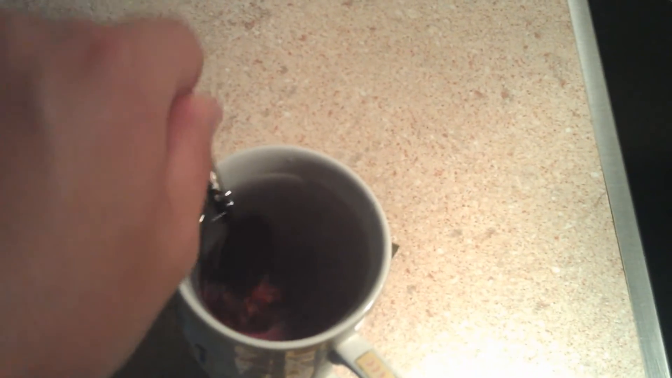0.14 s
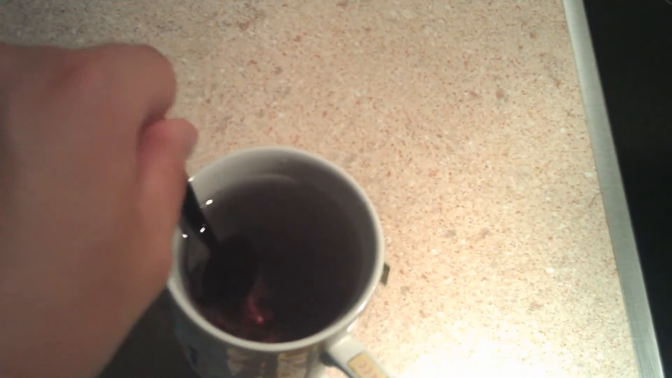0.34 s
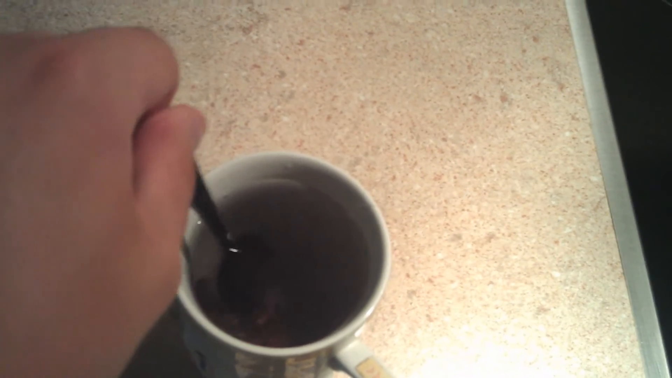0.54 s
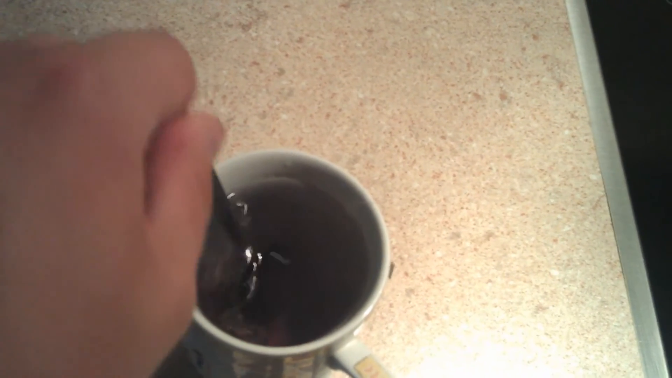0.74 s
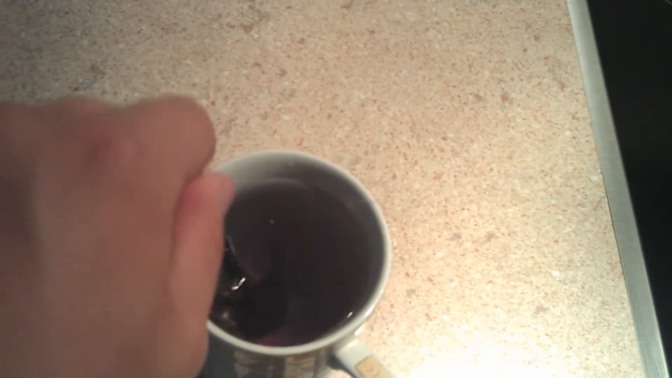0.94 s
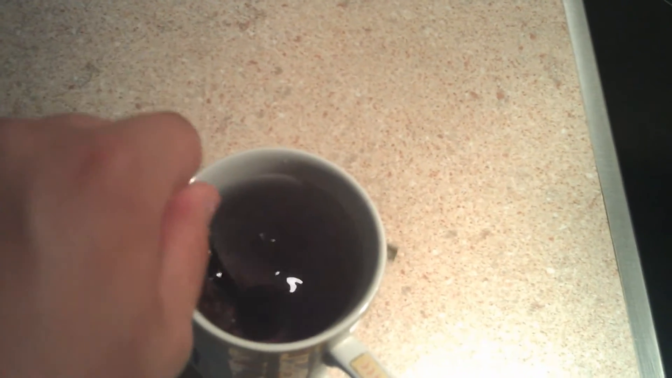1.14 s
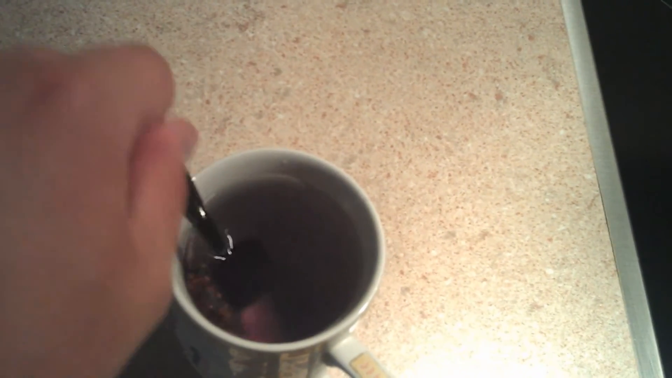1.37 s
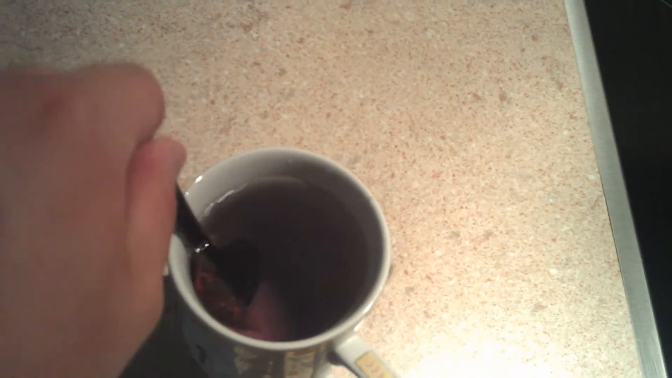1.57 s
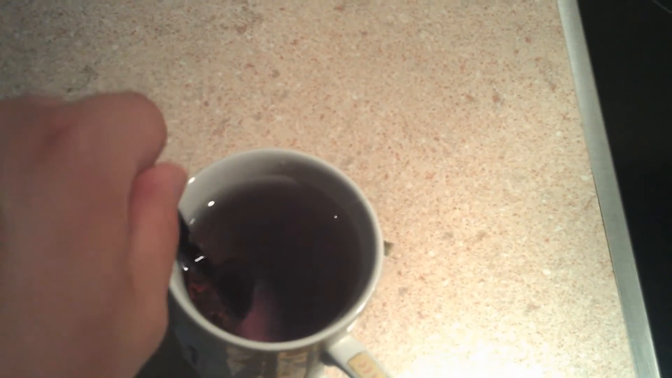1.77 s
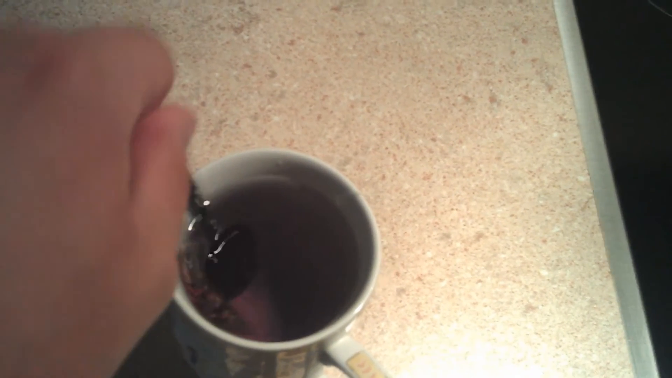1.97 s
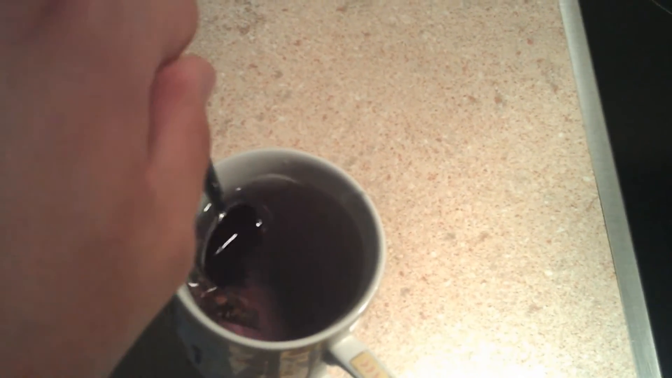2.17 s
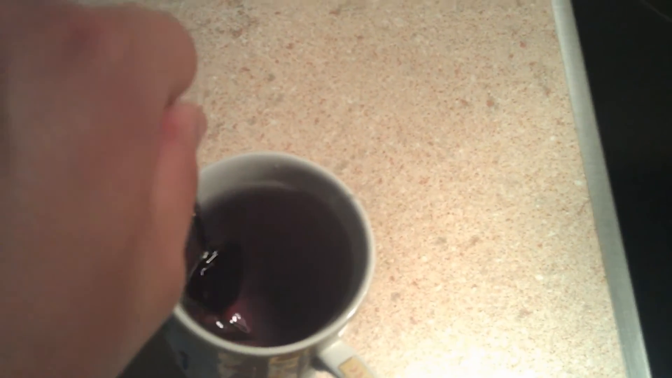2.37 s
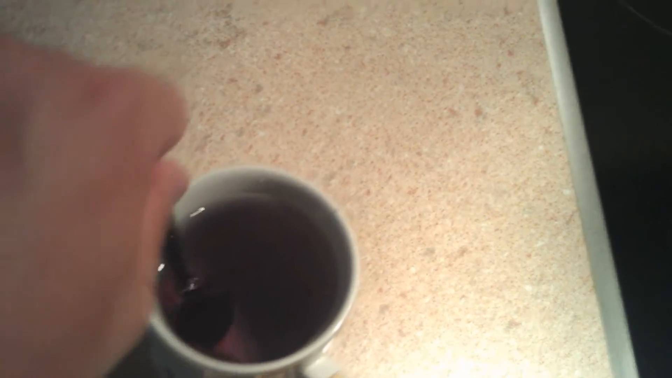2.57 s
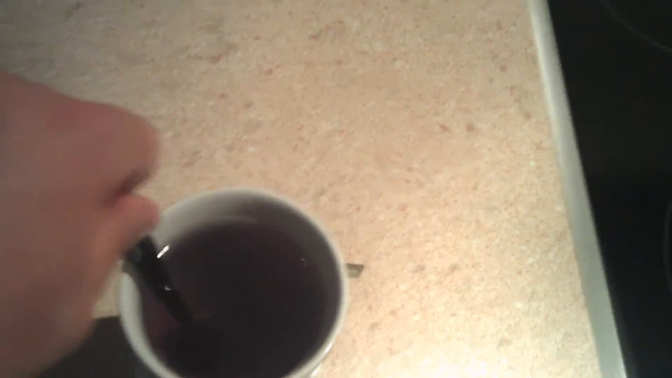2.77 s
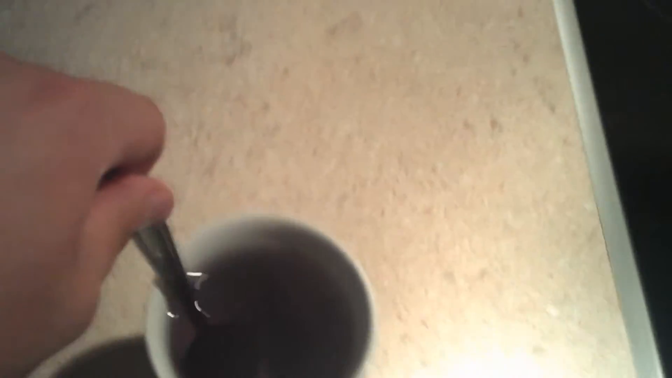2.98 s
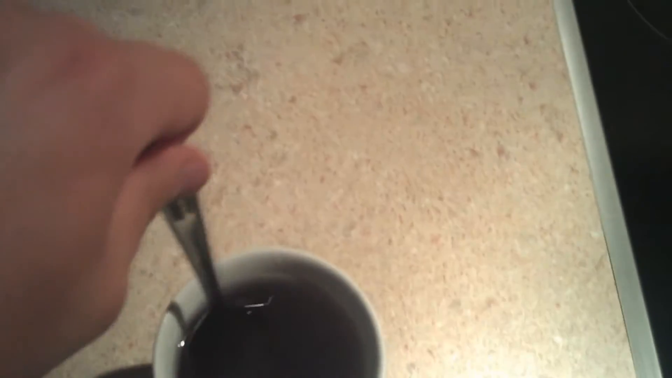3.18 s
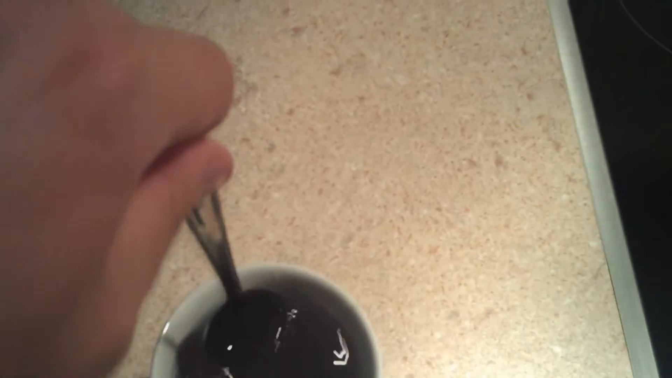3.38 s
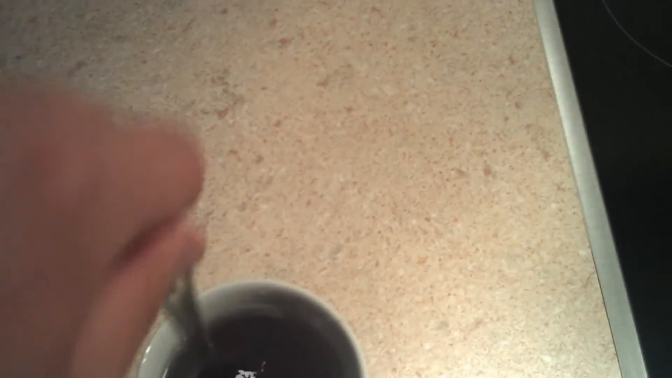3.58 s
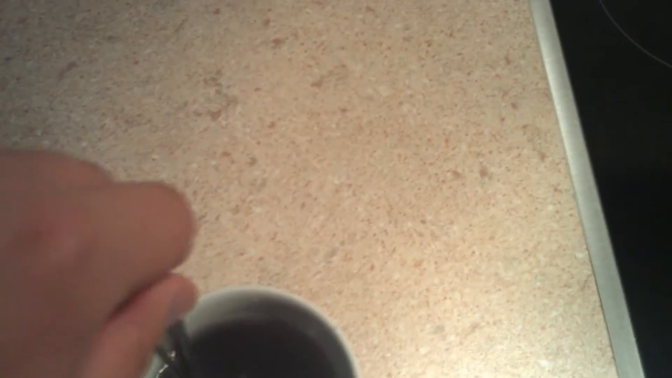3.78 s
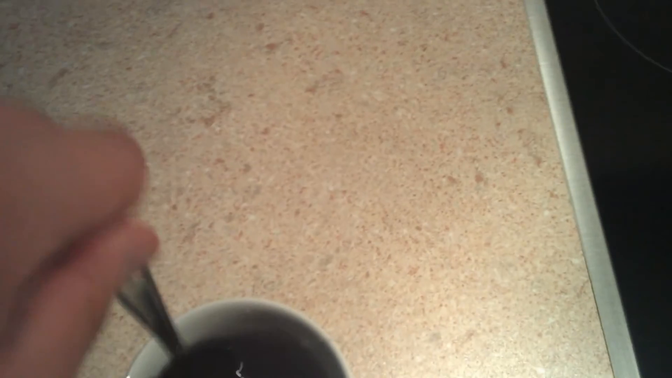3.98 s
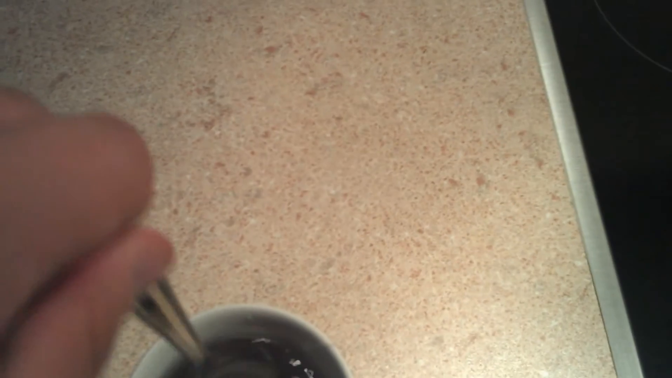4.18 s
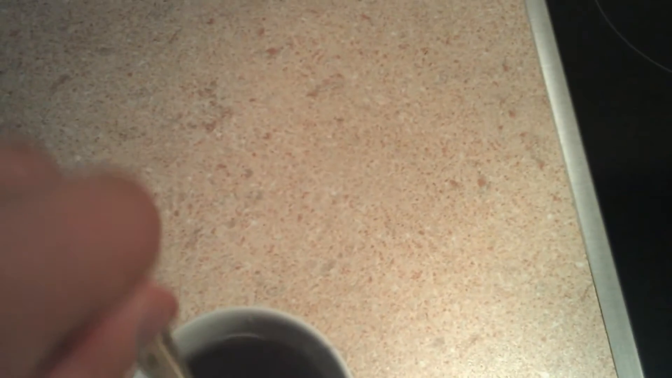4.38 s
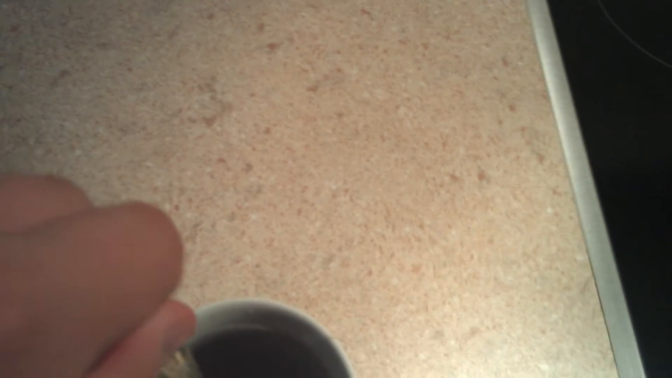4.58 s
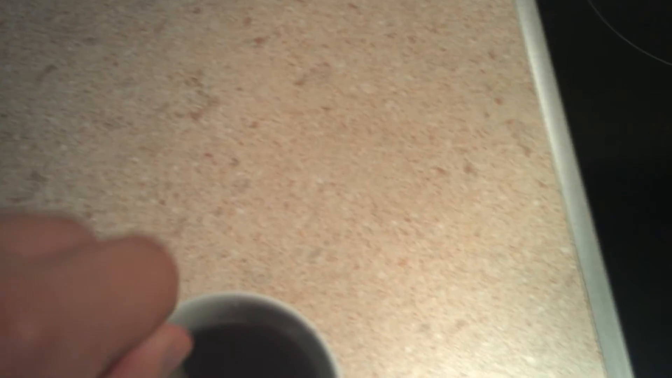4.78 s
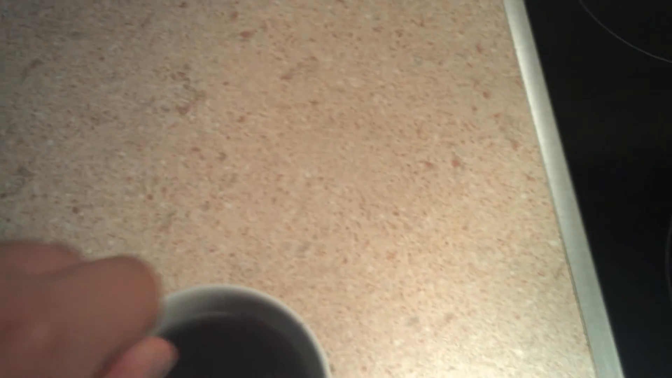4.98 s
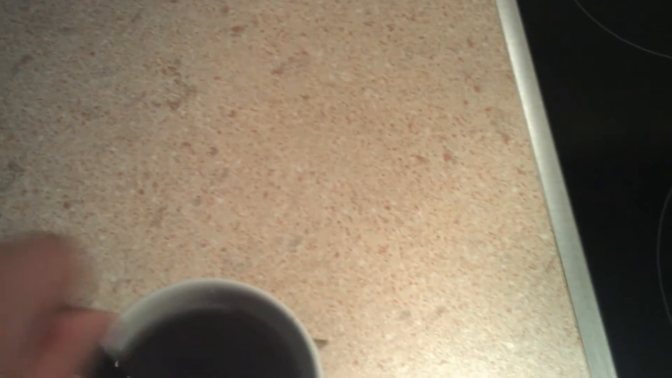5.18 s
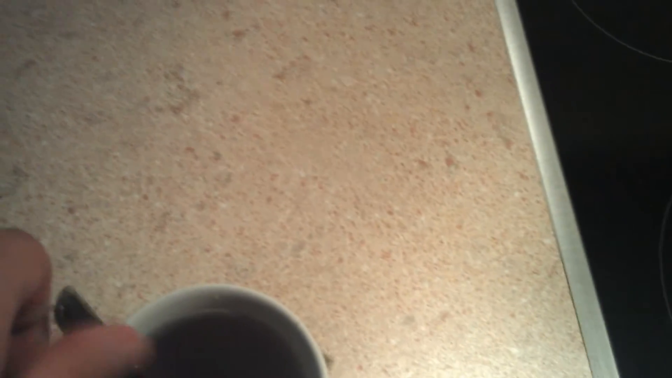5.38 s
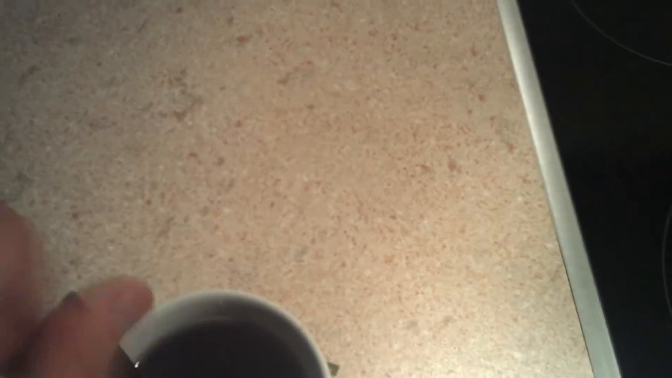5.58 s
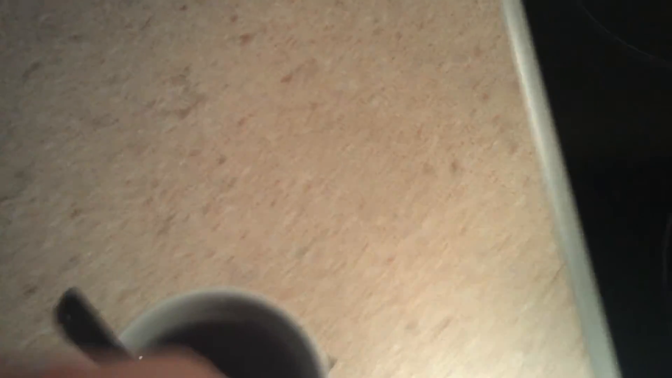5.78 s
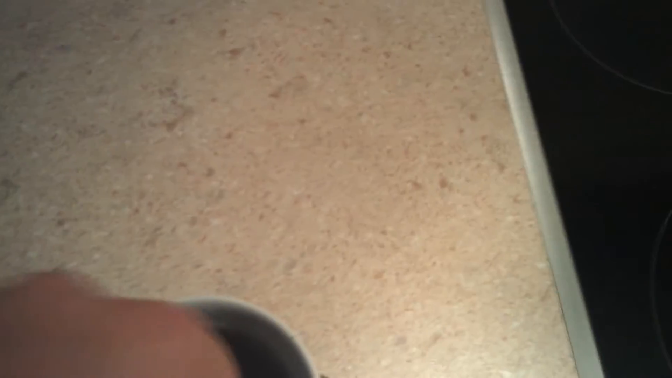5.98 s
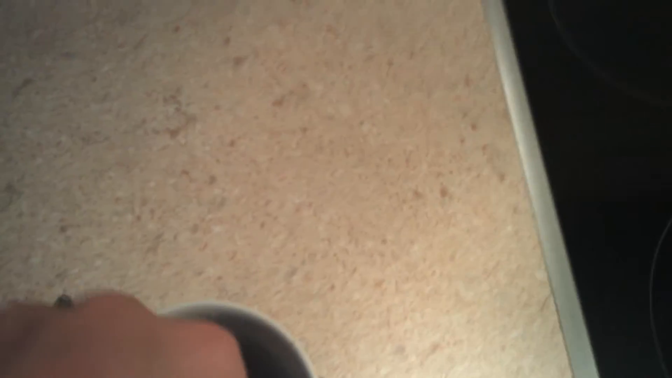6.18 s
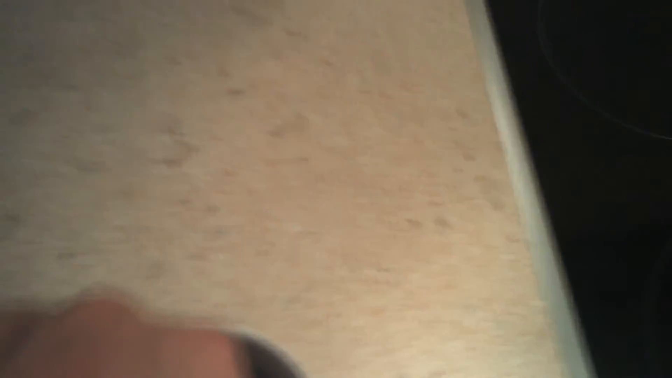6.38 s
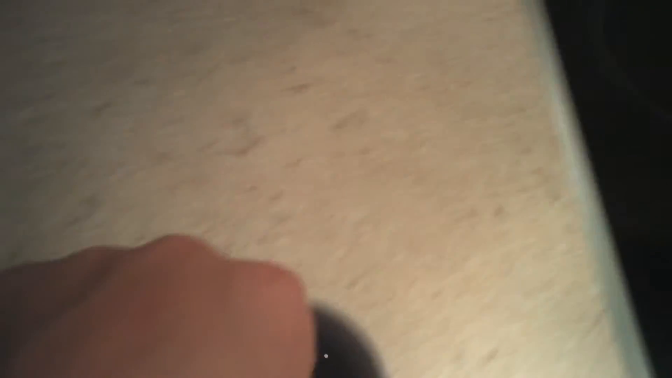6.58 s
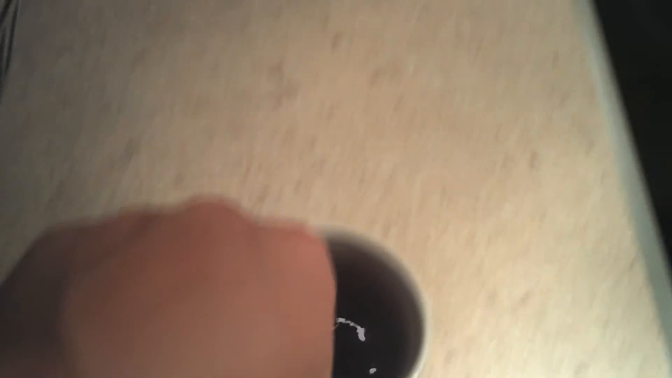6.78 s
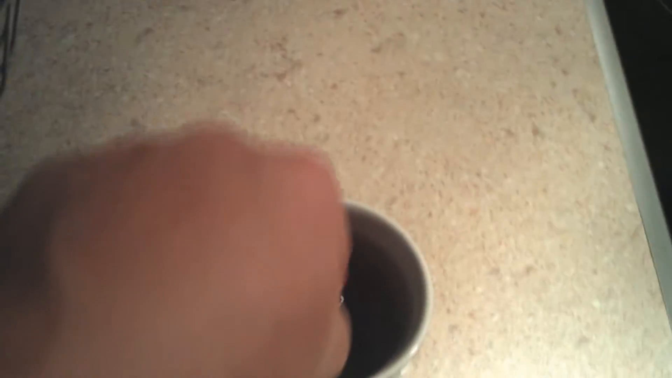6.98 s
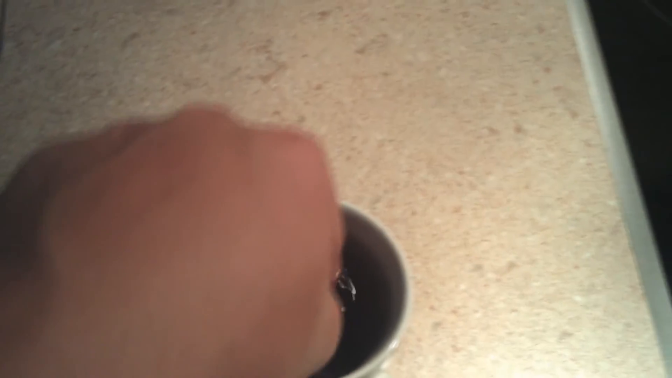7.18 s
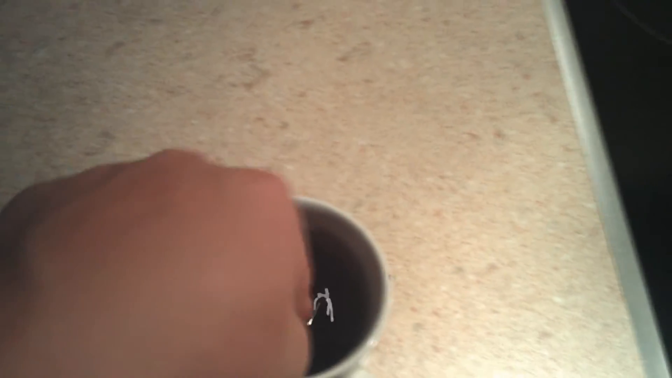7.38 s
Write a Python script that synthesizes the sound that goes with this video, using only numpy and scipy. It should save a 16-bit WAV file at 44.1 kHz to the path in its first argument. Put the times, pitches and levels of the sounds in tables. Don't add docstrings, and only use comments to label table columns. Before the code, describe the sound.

Isolated spoon knocks in a full ceramic mug, long quiet gaps, then a bright rim clink and quick rattle over soft room noise.

```python
import sys
import numpy as np
from scipy import signal
from scipy.fft import rfft, irfft, next_fast_len
from scipy.io import wavfile

SR = 44100
rng = np.random.default_rng(int(sys.argv[2]) if len(sys.argv) > 2 else 0)


def log_audio(samples):
    frames = np.atleast_2d(samples).T
    limited = np.clip(frames, -1, 1)
    pcm = np.round(limited * 32767).astype(np.int16)
    wavfile.write(sys.argv[1], SR, pcm)


def makeup_ratio(level_db):
    decades = np.asarray(level_db, float) / 20
    return 10 ** decades


N = 328104
PADDED = next_fast_len(N + SR)
PORT_HALVES = np.array([[0.5], [-0.5]])


def at_hz(points, hz):
    table_hz, value = np.transpose(points)
    return np.interp(np.log(np.maximum(hz, 1)), np.log(table_hz), value)


def rms_one(x):
    return x / np.sqrt(np.mean(x ** 2) + 1e-20)


def band(x, low_hz, high_hz):
    return signal.sosfilt(signal.butter(2, [low_hz, high_hz], "band", fs=SR, output="sos"), x)


def add(out, sound, start_s):
    i = round(start_s * SR)
    out[:, i:i + sound.shape[1]] += sound[:, :N - i]


def decay(hz, t60_s, side_db, lead_rad):
    t = np.arange(int(min(t60_s, 0.8) * SR) + 2) / SR
    contact_s = 0.00062 + 0.42 / hz
    swell = 1 - np.exp(-(t / contact_s) ** 2)
    sine = np.sin(2 * np.pi * hz * t + lead_rad * PORT_HALVES)
    return makeup_ratio(-60 * t / t60_s) * swell * sine * makeup_ratio(side_db * PORT_HALVES)


# (start_s, spot struck, counter_thud_db, mug_ring_db, spoon_db)
KNOCKS = [(.083, "tap", -35, -44, -38), (0.086, "tap", -33, -58, -38), (0.116, "tap", -35.5, -58, -35),
          (0.2656, "bottom", -12, -23, -22), (.268, "bottom", -7, -62, -23), (1.121, "held", -16, -41, -18),
          (1.694, "glance", -38, -57, -36), (2.82, "side", -14, -38, -23), (2.901, "glance", -29, -40, -25),
          (5.303, "rim", -34, -46, -12), (5.452, "rattle", -36, -39, -25), (5.456, "rattle", -38, -48, -27),
          (5.479, "rattle", -38, -37, -26), (5.496, "rattle", -40, -43, -28),
          (5.514, "rattle", -39, -47, -34)]
SPOT_WALL = {"tap": (18, 0, -9, .6), "bottom": (-15, -4, -18, 3), "held": (-5, -2, -13, .4),
             "rim": (6, -16, -2, 1.5), "rattle": (-7, -25, -21, 3), "side": (5, 4, -2, 1.1),
             "glance": (-4, -5, -20, 1)}
SPOT_RIM = {"tap": (-21, -30, -32, -12, -30), "bottom": (-9, -22, -5, -19, -15),
            "held": (-15, -3, -17, -6, -3), "rim": (-2, 11, -5, 8, -12), "rattle": (2, 5, -1, 3, -25),
            "side": (-17, -20, -13, -17, -11), "glance": (-11, -15, -18, -30, -30)}
SPOT_SPOON = {"tap": (-12, -8, -3, .05), "bottom": (-6, -3, -3, 0.05), "held": (-5, -8, -1, 0.037),
              "rim": (-6, -20, -5, .028), "rattle": (-7, -9, 1, 0.055), "side": (-10, .1, -3, .03),
              "glance": (.1, -13, -6, 0.041)}


def contacts():
    wall, rim, steel = [], [], []
    for start_s, spot, thud_db, ring_db, spoon_db in KNOCKS:
        *shares_db, grip_t60_s = SPOT_WALL[spot]
        stem_db, bowl_db, edge_db, damping_t60_s = SPOT_SPOON[spot]
        wall.append((start_s, grip_t60_s, thud_db, ring_db, *(ring_db + np.array(shares_db))))
        rim.append((start_s, grip_t60_s, *(ring_db + np.array(SPOT_RIM[spot]))))
        parts_db = spoon_db + np.array([stem_db, bowl_db, 0, edge_db])
        steel.append((start_s, *parts_db, damping_t60_s))
    return wall, rim, steel


# (group, pitch_hz, level_db, t60_s, left_minus_right_db, left_lead_rad)
WALL_MODES = [(0, 335, -10, .07, 3, 1.0), (0, 500, -5, .06, 4, 2.1), (0, 565, -7, .05, 3, 2.3),
              (0, 745, -6, .045, 1, 3.3), (0, 950, -1.5, .04, 0, 4.4), (0, 1515, -6, .045, -2, 5.7),
              (0, 1865, -7, .04, -2, 5.9), (1, 2563, 3, .3, -1, .1), (2, 2660, 3, .45, -1, .2),
              (3, 4490, 3, .47, -1, -2.9), (4, 5545, 3, .44, -1, .1)]
RIM_MODES = [(0, 7185, -8, .2, -5, .3), (0, 7322, 3, .25, -5, .2), (1, 8490, 0, .25, -6, .3),
             (1, 8558, -5, .45, -6, .2), (2, 9410, 2, .27, -5, .1), (2, 9680, -7, .3, -4, .8),
             (1, 10430, 0, .25, 3, .5), (1, 11150, -4, .22, 6, -.6), (3, 12090, -5, .2, 8, .6),
             (3, 12310, -4, .2, 8, -.5), (4, 13180, -2, .24, 8, .1), (4, 14350, -16, .2, 8, 1.2)]


def mug(modes, knocks):
    out = np.zeros((2, N))
    for group, hz, level_db, t60_s, side_db, lead_rad in modes:
        ring = decay(hz, t60_s, side_db, lead_rad)
        t = np.arange(ring.shape[1]) / SR
        for start_s, grip_t60_s, *strength_db in knocks:
            gain_db = level_db + strength_db[group] - 60 * t / grip_t60_s
            add(out, makeup_ratio(gain_db) * ring, start_s)
    return out


# (low_hz, high_hz)
SPOON_BANDS = [(2420, 3050), (3500, 5900), (7500, 9900), (10200, 14400)]
# (pitch_hz, left_minus_right_db)
PORT_TILT = [(300, 3), (1000, -3), (2600, -3), (8000, -9), (9800, -5), (11000, 7), (14500, 11)]


def spoon(knocks):
    out = np.zeros((2, N))
    per_band = 14
    pitches = []
    for low_hz, high_hz in SPOON_BANDS:
        uneven = 1 + 0.012 * rng.standard_normal(per_band)
        pitches.append(np.geomspace(low_hz, high_hz, num=per_band) * uneven)
    chance = rng.standard_normal((len(knocks), len(pitches), per_band, 3))
    for (start_s, *parts_db, t60_s), drawn in zip(knocks, chance):
        for level_db, part, rows in zip(parts_db, pitches, drawn):
            for hz, (share, turn, life) in zip(part, rows):
                lead_rad = turn * min(hz / 6000, 1.3)
                ring = decay(hz, t60_s * makeup_ratio(1.6 * life), at_hz(PORT_TILT, hz), lead_rad)
                add(out, makeup_ratio(level_db - 9 + 4.26 * share) * ring, start_s)
    return out


# (start_s, length_s, level_db)
CHATTER = [
    (5.452, 0.092, -43.5),
    (.083, 0.0446, -72),
]


def chatter():
    t, out = np.arange(N) / SR, np.zeros((2, N))
    touches_per_s = 350
    strength = np.zeros(N)
    for start_s, length_s, level_db in CHATTER:
        during = (t > start_s) * (t < start_s + length_s)
        fading = 1 - 0.69 * (t - start_s) / length_s
        strength += makeup_ratio(level_db) * during * fading
    touches = strength * (rng.random(N) < touches_per_s / SR)
    for _, hz, level_db, t60_s, side_db, lead_rad in RIM_MODES[:10] + WALL_MODES[7:9]:
        ring = decay(hz, 0.31 * t60_s, side_db, lead_rad)
        for i in np.flatnonzero(touches):
            add(out, touches[i] * makeup_ratio(level_db) * rng.standard_normal() * ring, i / SR)
    return out


# (pitch_hz, t60_s)
ROOM_T60 = [(200, 0.45), (1000, 0.47), (4000, 0.5), (9000, 0.31), (14000, 0.15)]


def kitchen(knocks):
    room_db, first_walls_s = -9.5, 0.0013
    t = np.arange(SR // 2) / SR
    white = rng.standard_normal((2, 2, len(t)))
    edges_hz = 120 * 2 ** np.arange(0, 7.1, 0.5)
    tail = 0
    for k, (low_hz, high_hz) in enumerate(zip(edges_hz, edges_hz[1:])):
        tail = tail + band(white[k % 2], low_hz, high_hz) * makeup_ratio(-60 * t / at_hz(ROOM_T60, low_hz))
    tail = tail * (1 - np.exp(-t / first_walls_s))
    tail = tail / np.sqrt(np.sum(tail ** 2, axis=1, keepdims=True))
    return makeup_ratio(room_db) * irfft(rfft(knocks, PADDED) * rfft(tail, PADDED), PADDED)[:, :N]


# (pitch_hz, level_db)
MIC = [(40, -10), (90, -1), (5900, 1.04), (6500, -7), (7100, -1.8), (14500, 1), (15000, -10), (16500, -16)]


def microphone(x):
    hz = np.arange(PADDED // 2 + 1) * SR / PADDED
    return irfft(rfft(x, PADDED) * makeup_ratio(at_hz(MIC, hz)), PADDED)[:, :N]


# (time_s, level_db, half_length_s)
SLOSH = [
    (4.529, -50.5, .02),
    (4.67, -57, .02),
]


def slosh():
    t = np.arange(N) / SR
    swell = sum(makeup_ratio(db) * np.exp(-((t - time_s) / half_s) ** 2) for time_s, db, half_s in SLOSH)
    return swell * rms_one(band(rng.standard_normal((2, N)), 1800, 3500)) * makeup_ratio([[-2.5], [2.5]])


# (pitch_hz, level_db)
HUM = [(100, -22), (200, 2.5), (300, -12), (400, -14.5)]


def refrigerator(hum_db):
    t = np.arange(N) / SR
    waver = np.interp(t, np.linspace(0, t[-1], num=60), rng.standard_normal(60))
    tones = sum(makeup_ratio(db) * np.sin(2 * np.pi * hz * t + 0.5 * waver * hz / 200) for hz, db in HUM)
    return makeup_ratio(hum_db) * tones * makeup_ratio([[1.4], [-1.4]])


# (pitch_hz, level_db_per_hz)
AIR_LEFT = [(60, -96.5), (100, -84.5), (137, -65), (170, -77.5), (320, -68.5), (480, -72), (800, -64),
            (1000, -70), (1200, -72), (2000, -75.5), (4000, -76.5), (7500, -88.5), (9500, -83),
            (14000, -83.5)]
AIR_RIGHT = [(60, -100), (100, -90.5), (137, -73.5), (170, -77), (320, -70), (550, -73.5), (800, -66.5),
             (950, -66), (1200, -73.5), (2000, -74), (4000, -79.5), (7000, -88), (8800, -85),
             (14000, -93.5)]
# (pitch_hz, likeness 0 to 1)
AIR_ALIKE = [(60, 0.62), (140, 0.87), (300, 0.58), (900, .6), (2000, 0.21), (12000, 0.21)]
# (pitch_hz, left_lead_rad)
PORT_TURN = [(260, 0.035), (500, 1.59), (950, 5.15), (1400, 4.83), (3000, 6.54)]


def air(rumble_db):
    air_db, top_hz = -51.5, 13900
    hz = np.arange(PADDED // 2 + 1) * SR / PADDED
    mid, side = rfft(rng.standard_normal((2, PADDED))) * (hz < top_hz)
    alike = np.clip(at_hz(AIR_ALIKE, hz), 0, 1)
    shared, apart = np.sqrt(1 + alike) * mid, np.sqrt(1 - alike) * side
    left = (shared + apart) * makeup_ratio(at_hz(AIR_LEFT, hz))
    right = (shared - apart) * makeup_ratio(at_hz(AIR_RIGHT, hz))
    right = right * np.exp(-1j * at_hz(PORT_TURN, hz))
    noise = rms_one(irfft(np.array([left, right]), PADDED)[:, :N])
    return makeup_ratio(air_db + 3) * (noise + makeup_ratio(rumble_db) * band(noise, 69, 430))


# (time_s, hum_db, rumble_db)
BACKGROUND = [(0.0, -58, -60.5), (0.5, -59, -62), (0.89, -53.5, -67), (1.37, -57, -63), (1.55, -72, -65),
              (1.84, -54, -72), (1.9, -62.5, -74), (2.07, -55.5, -61), (3.02, -57, -56), (3.52, -62, -73),
              (4.68, -58.5, -89), (5.22, -62, -66), (7.38, -58, -103), (7.44, -64, -74)]


def scene():
    time_s, *columns = np.transpose(BACKGROUND)
    hum_db, rumble_db = [np.interp(np.arange(N) / SR, time_s, column) for column in columns]
    wall, rim, steel = contacts()
    knocks = mug(WALL_MODES, wall) + mug(RIM_MODES, rim) + spoon(steel) + chatter()
    near = microphone(knocks + kitchen(knocks))
    return near + slosh() + refrigerator(hum_db) + air(rumble_db + 58)


def roll_off(x):
    return signal.sosfilt(signal.butter(12, 16620, fs=SR, output="sos"), x)


def record(dry):
    mix = 1.241 * np.tanh(dry / 1.162)
    return roll_off(mix)


dry = scene()
out = record(dry)
log_audio(out)
```